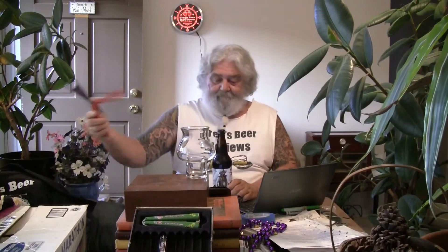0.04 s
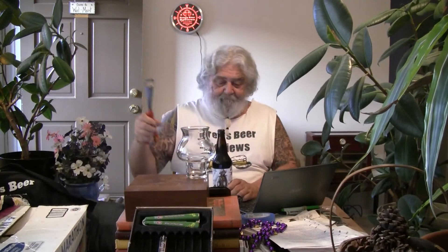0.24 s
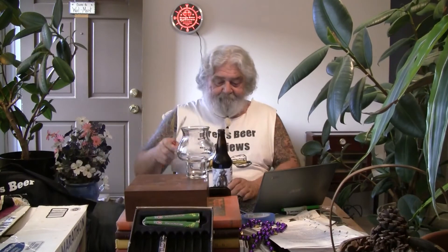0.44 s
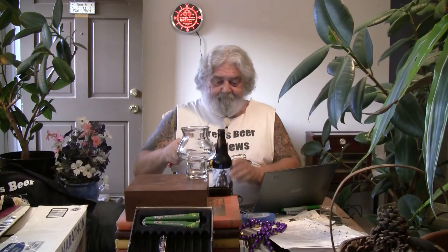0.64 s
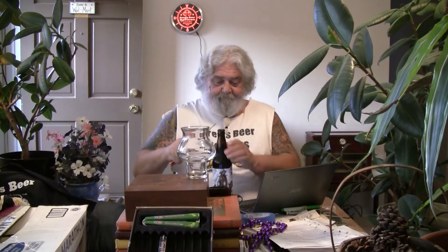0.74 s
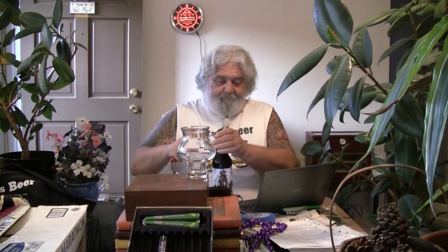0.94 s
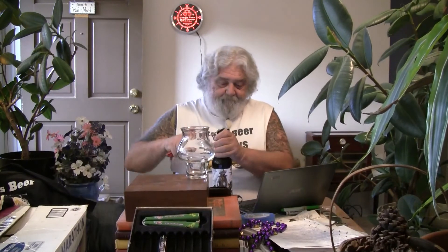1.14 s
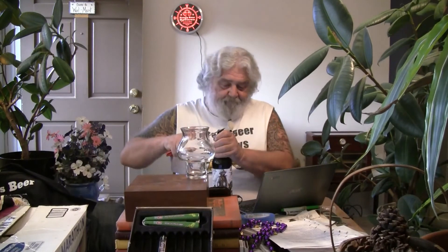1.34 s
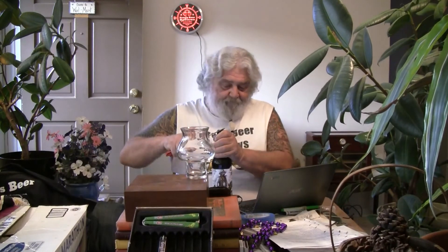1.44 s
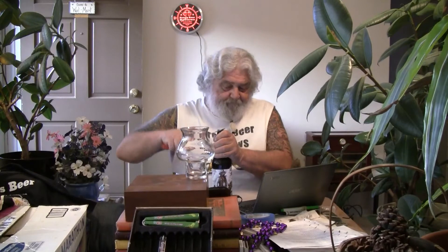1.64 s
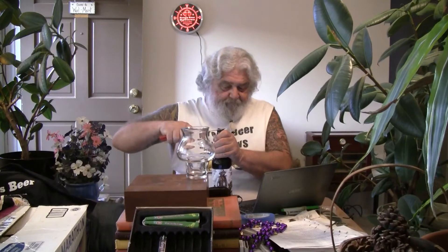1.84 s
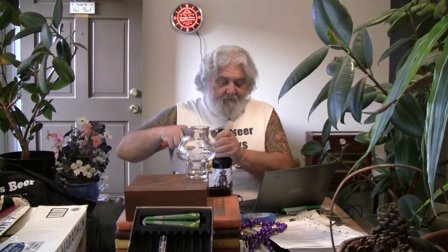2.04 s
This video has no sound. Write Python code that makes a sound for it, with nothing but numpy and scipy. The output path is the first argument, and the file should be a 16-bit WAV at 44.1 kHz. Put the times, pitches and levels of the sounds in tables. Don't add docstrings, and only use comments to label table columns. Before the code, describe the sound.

Opening a glass beer bottle: metal handles rattle, steel knocks the neck, gas spurts, cap ticks loose

```python
import sys
import numpy as np
from scipy import signal
from scipy.fft import rfft, irfft
from scipy.io import wavfile
from scipy.ndimage import uniform_filter1d

SR = 44100
rng = np.random.default_rng(int(sys.argv[2]) if len(sys.argv) > 2 else 0)


def int16_out(signal):
    q = np.round(np.clip(np.atleast_2d(signal).T, -1, 1) * 32767)
    wavfile.write(sys.argv[1], SR, q.astype(np.int16))


def how_loud(loudness_db):
    steps = np.asarray(loudness_db, float) / 20
    return 10 ** steps


N = 92610


def rms_one(x):
    return x / np.sqrt(np.mean(x ** 2) + 1e-20)


def at_hz(points, hz):
    points = np.array(points)
    return np.interp(np.log(hz), np.log(points[:, 0]), points[:, 1])


def colour(x, spectrum):
    size = x.shape[-1]
    hz = np.arange(size // 2 + 1) * SR / size + 1
    return irfft(rfft(x) * how_loud(at_hz(spectrum, hz)), size)


def pair(likeness, size):
    mid, side = rfft(rng.standard_normal((2, size)))
    hz = np.arange(len(mid)) * SR / size + 1
    alike = np.clip(at_hz(likeness, hz), -1, 1)
    sides = np.sqrt(1 + alike) * mid + np.sqrt(1 - alike) * side * [[1], [-1]]
    return irfft(sides, size) / np.sqrt(2)


def contacts(hits):
    t = np.arange(2000) / SR
    push = np.zeros((len(hits), N + 2000))
    for row, (start_s, db, rattle_s) in zip(push, hits):
        grit = np.prod(rng.standard_normal((2, 2000)), axis=0)
        burst = np.sign(grit) * abs(grit) ** .65 * np.exp(-t / max(rattle_s, 1e-4))
        burst = burst * (t < 2 * rattle_s) * np.minimum(t / 0.00061, 1)
        start = int(start_s * SR)
        row[start:start + 2000] = how_loud(db) * burst / np.sqrt(np.sum(burst ** 2) + 1e-12)
    return push[:, :N]


def strike(hits, modes, ring_share, spread_db, crack_db, crack_hz, crack=None, split=0, swell=0.17):
    luck = rng.standard_normal((len(hits), 3 * len(modes)))
    out, push = np.zeros(N), contacts(hits)
    levels = how_loud(np.array(hits)[:, 1])
    heads = np.array([row[int(hit[0] * SR):][:1400] for row, hit in zip(push, hits)])
    trios = [(hz * (1 + split * k), db - 5, t60) for hz, db, t60 in modes for k in (-1, .2, .9)]
    for (hz, db, t60), strengths in zip(trios, luck.T):
        w = 2 * np.pi * hz / SR
        reached = abs(heads @ np.exp(1j * w * np.arange(1400)))
        even = levels / np.maximum(reached, levels / 4)
        drive = (even * how_loud(db + spread_db * strengths)) @ push + 1e-18
        q = np.exp(-swell * w / 2)
        fed = signal.lfilter([(1 - q * q) / 2, 0, (q * q - 1) / 2], [1, -2 * q * np.cos(w), q * q], drive)
        r = how_loud(-60 / (t60 * ring_share * SR))
        out += signal.lfilter([0, np.sin(w)], [1, -2 * r * np.cos(w), r * r], fed)
    band = signal.butter(4, crack_hz, "band", fs=SR, output="sos")
    dry_crack = signal.sosfilt(band, push.sum(axis=0))
    if crack is not None:
        dry_crack = colour(dry_crack, crack)
    return out + how_loud(crack_db) * dry_crack


# start in seconds, level in dB, rattle in seconds.
HANDLE_CLACKS = [
    (.1205, -36.5, 0.0016),
    (.1245, -19, 0.0075),
    (.132, -19.5, 0.0066),
    (.140, -20.5, 0.0046),
    (.147, -27.5, 0.0039),
    (.1545, -15.5, 0.0049),
    (.159, -19.5, 0.0058),
    (.172, -25, 0.0036),
    (.180, -27, 0.0031),
    (.214, -34, 0.0037),
]
# frequency in Hz, level in dB, T60 in seconds.
HANDLE_MODES = [(2800, -12.5, 0.27), (3037, -11, 0.077), (4155, -7, 0.064), (4217, -0.5, .1),
                (4750, -11, 0.089), (6133, -15, 0.16), (8344, -11, 0.21), (8800, -0.5, 0.11),
                (9857, -12.5, 0.62), (11100, -14.5, 0.061), (10550, 0, 0.036), (11130, -20, 0.0511),
                (12800, -16, .05), (14100, -13.5, .08)]
# frequency in Hz, level in dB per Hz.
HANDLE_CRACK = [(400, -29), (750, -23.5), (2000, -23), (2750, -10), (4200, -9.5), (5500, -9.5), (10500, -6),
                (15800, -15.5)]


def handles_clack():
    return strike(HANDLE_CLACKS, HANDLE_MODES, ring_share=0.42, spread_db=1.0,
                  crack_db=34.5, crack_hz=[450, 15500], crack=HANDLE_CRACK, split=.011)


# start in seconds, level in dB, rattle in seconds.
JINGLE_HITS = [(.0002, -38.5, 0.016), (.039, -50, 0.0039), (.0515, -39, 0.0044), (.064, -43.5, .004),
               (.0705, -44.5, .006), (.090, -52.5, 0.0034), (.102, -54, 0.0091)]
# frequency in Hz, level in dB, T60 in seconds.
LOOSE_MODES = [(3630, -9, .03), (4040, -2, .03), (4720, 0.5, 0.018), (6200, -10, .1), (8350, -8, 0.051),
               (9500, -8, .04), (9860, -15.5, 0.042), (10750, -10, .04)]


def handles_jingle():
    return strike(JINGLE_HITS, LOOSE_MODES, ring_share=0.53, spread_db=3.5,
                  crack_db=23, crack_hz=[1500, 10500], split=0.017)


# start in seconds, level in dB, rattle in seconds.
LATCH_HITS = [
    (.3365, -45, 0.0074),
    (.3572, -31.5, .003),
    (.371, -44.5, .005),
    (.478, -62, 0.0024),
]
# frequency in Hz, level in dB, T60 in seconds.
PIVOT_MODES = [(2900, -2, .08), (2940, -4, 0.052), (3036, -10, 0.1), (3140, 1.5, 0.13), (4400, -32, 0.024),
               (8500, -16.5, 0.066), (9580, -8, 0.184), (10180, -18.5, 0.18), (12350, -24, 0.064)]


def pivot_latches():
    return strike(LATCH_HITS, PIVOT_MODES, ring_share=0.26, spread_db=4.0,
                  crack_db=17, crack_hz=[2400, 10000], split=0.0028)


# start in seconds, level in dB, rattle in seconds.
SQUEAK_HITS = [
    (.513, -60.5, .011),
]
# frequency in Hz, level in dB, T60 in seconds.
PIN_MODES = [(6400, 0, .04)]


def pin_squeaks():
    return strike(SQUEAK_HITS, PIN_MODES, ring_share=0.41, spread_db=-7.0, crack_db=-29, crack_hz=[2000, 9000])


# start in seconds, level in dB, rattle in seconds.
CLINK_HITS = [
    (.9685, -32.5, 0.00159),
    (.992, -48, .002),
]
# frequency in Hz, level in dB, T60 in seconds.
BLADE_MODES = [(1536, -25, .04), (2020, -16, 0.044), (3025, 0.5, .1), (3060, -15, 0.25), (3720, -12, 0.23),
               (4080, -14, 0.12), (5210, -12, 0.27), (5400, -16.5, 0.4), (6690, -13.5, .1), (7150, -17, .1),
               (7540, -15.5, .15), (8500, -18, .2), (9600, -20, 0.14), (10790, -27, .2)]


def blade_clinks():
    return strike(CLINK_HITS, BLADE_MODES, ring_share=0.72, spread_db=3.0,
                  crack_db=10, crack_hz=[1300, 9000], split=0.0047)


# start in seconds, level in dB, rattle in seconds.
BITE_HITS = [
    (1.0705, -29, .005),
    (1.099, -39.5, 0.0057),
]
# frequency in Hz, level in dB, T60 in seconds.
CRIMP_MODES = [(2284, -8, 0.093), (2456, -10, 0.14), (3155, 2.5, 0.092), (3490, -9.5, .2),
               (3811, -10.5, 0.074), (4150, -9, 0.17), (4450, -7.5, .15), (5370, -6.5, 0.17),
               (6770, -10, 0.11), (7740, -17.5, 0.13), (9000, -15, 0.11), (9900, -11, .15),
               (10700, -22, .12), (12500, -22, .08)]


def lip_bites():
    return strike(BITE_HITS, CRIMP_MODES, ring_share=0.32, spread_db=-0.5,
                  crack_db=-12, crack_hz=[1800, 11500], split=0.0089)


# start in seconds, level in dB, rattle in seconds.
SEAT_HITS = [
    (1.071, -33, 0.0016),
    (1.104, -58, .004),
    (1.1775, -40, 0.012),
    (1.221, -49.5, 0.0074),
]
# frequency in Hz, level in dB, T60 in seconds.
SHOULDER_MODES = [(776, -15, 0.027), (867, -2, 0.032), (978, 2.5, 0.041), (1320, -4.5, 0.0172)]


def shoulder_answers():
    return strike(SEAT_HITS, SHOULDER_MODES, ring_share=0.48, spread_db=5.0,
                  crack_db=0, crack_hz=[500, 1800], split=0.042, swell=.4)


# start in seconds, level in dB, rattle in seconds.
BUMP_HITS = [
    (1.079, -33, 0.0066),
    (1.098, -36.5, 0.0038),
    (1.1775, -46.5, 0.0022),
    (1.225, -44.5, 0.00814),
    (1.693, -38.5, 0.0061),
    (1.7075, -28.5, 0.011),
    (1.722, -38.5, 0.0048),
    (1.745, -44.5, 0.0053),
    (1.765, -43, 0.0055),
    (1.80, -45, 0.025),
]
# frequency in Hz, level in dB, T60 in seconds.
TABLE_MODES = [(135, -17, 0.033), (187, -14, .079), (281, -5.5, 0.069), (355.3, 1, 0.066), (482, -4.5, 0.1),
               (601, -5.5, 0.084), (832, -7.5, 0.026), (992, -2.5, 0.038), (1363, -9, 0.026),
               (1880, -11.5, 0.021)]


def table_bumps():
    return strike(BUMP_HITS, TABLE_MODES, ring_share=0.41, spread_db=3.5,
                  crack_db=10, crack_hz=[150, 1800], split=0.068, swell=1.0)


# start in seconds, level in dB, rattle in seconds.
THUD_HITS = [
    (.938, -38.5, 0.0062),
    (.953, -43.5, 0.015),
    (.975, -41, 0.016),
]
# frequency in Hz, level in dB, T60 in seconds.
BELLY_MODES = [(338, -4.5, .05), (438, 1.5, 0.062), (508, 2, .06), (666, -8, 0.045), (1421, -1.5, 0.036),
               (1920, -2.5, 0.024)]


def belly_thuds():
    return strike(THUD_HITS, BELLY_MODES, ring_share=0.66, spread_db=4.0,
                  crack_db=1, crack_hz=[300, 4000], split=0.039, swell=1.0)


# frequency in Hz, level in dB per Hz.
GAS_SPECTRUM = [(530, -14), (900, -14.5), (1700, -15), (2090, -15), (4090, -8), (6230, -9), (6770, -6.5),
                (11500, -0.5), (15900, -7.5)]


def gas():
    start_s, rise_s, hold_s, t60_s, level_db = 1.661, 0.016, 0.014, 0.057, -25.5
    t = np.arange(N) / SR - start_s
    fall = how_loud(-60 * np.clip(t - rise_s - hold_s, 0, 1) / t60_s)
    shape = np.clip(t / rise_s, 0, 1) * fall
    spit = how_loud(0.78 * rms_one(uniform_filter1d(rng.standard_normal(N), size=60)))
    jet = rms_one(spit * colour(rng.standard_normal(N), GAS_SPECTRUM))
    return how_loud(level_db) * shape * jet


# start in seconds, level in dB, rattle in seconds.
KNOCK_HITS = [
    (.9365, -22, 0.0016),
    (1.0745, -62, 0.0026),
]
# frequency in Hz, level in dB, T60 in seconds.
RIM_MODES = [(1500, -37, 0.015), (4070, -21, 0.049), (6850, -14.5, 0.067), (9200, -31, 0.018),
             (11950, -21, 0.03)]
# frequency in Hz, level in dB, T60 in seconds.
BOTTLE_MODES = [(386.2, -14.5, 0.32), (452, -5.5, 0.07), (484, -11.5, 0.073), (585, -10, 0.066),
                (1035.3, 0, 0.21)]


def neck_knocks():
    rim = strike(KNOCK_HITS, RIM_MODES, ring_share=1.0, spread_db=2.0,
                 crack_db=8.0, crack_hz=[1300, 11000], split=0.046)
    body = strike(KNOCK_HITS, BOTTLE_MODES, ring_share=0.92, spread_db=6.0,
                  crack_db=-20, crack_hz=[300, 1500], swell=0.071)
    return rim, body


# start in seconds, level in dB, rattle in seconds.
POP_HITS = [
    (1.7105, -31.5, .006),
]
# frequency in Hz, level in dB, T60 in seconds.
HEADSPACE_MODES = [(136.4, -9, 0.033), (228, -5, 0.032), (403, -4, 0.056)]


def neck_pops():
    return strike(POP_HITS, HEADSPACE_MODES, ring_share=0.61, spread_db=-2.0,
                  crack_db=1, crack_hz=[150, 900], swell=0.71)


# start in seconds, level in dB, rattle in seconds.
DROP_HITS = [
    (1.9035, -41.5, 0.0045),
    (2.0625, -45.5, 0.0027),
]
# frequency in Hz, level in dB, T60 in seconds.
NECK_MODES = [(484, 4.5, 0.082), (722, -2, 0.071), (1290, 2, 0.016), (1677, -0.5, 0.038),
              (1970, -2.5, 0.0094)]


def cap_drops():
    return strike(DROP_HITS, NECK_MODES, ring_share=0.66, spread_db=-0.5,
                  crack_db=12, crack_hz=[300, 2500], split=0.014, swell=0.33)


# start in seconds, level in dB, rattle in seconds.
TICK_HITS = [
    (1.9045, -56.5, 0.0016),
    (1.9085, -46, 0.00046),
    (1.937, -68, 0.0026),
    (2.003, -64, 0.003),
    (2.024, -63, 0.018),
    (2.0635, -63, .002),
    (2.0675, -62.5, 0.0034),
]
# frequency in Hz, level in dB, T60 in seconds.
CAP_MODES = [(3870, 9, 0.022), (6500, 7.5, 0.017), (7600, 1, .02), (9500, 4.5, 0.021), (9600, -6, 0.011),
             (11200, -0.5, .04), (13700, -15, .02)]


def cap_ticks():
    return strike(TICK_HITS, CAP_MODES, ring_share=0.4, spread_db=-3.0,
                  crack_db=-5, crack_hz=[2500, 14000], split=0.028, swell=0.13)


# frequency in Hz, left-right likeness from -1 to 1.
ECHO_LIKENESS = [(100, 1), (500, 0.86), (1500, 1), (4000, 0.81), (8000, 0.42), (14000, -0.66)]
# frequency in Hz, T60 in seconds.
ECHO_T60 = [(100, 0.54), (400, 0.28), (1000, 0.31), (3000, 0.26), (4500, 0.28), (9000, 0.25), (15000, 0.24)]


def room(x):
    level_db, gap_s = 2.5, 0.002
    size = SR // 2
    t, noise, echo = np.arange(size) / SR, pair(ECHO_LIKENESS, size), 0
    edges = 40 * 2 ** np.arange(0, 9.01, .5)
    for low, high in zip(edges, edges[1:]):
        band = signal.sosfilt(signal.butter(2, [low, high], "band", fs=SR, output="sos"), noise)
        echo = echo + band * how_loud(-60 * t / at_hz(ECHO_T60, np.sqrt(low * high)))
    power = np.mean(abs(rfft(echo)) ** 2, axis=0)
    even = np.sqrt(uniform_filter1d(power, size=800) / uniform_filter1d(power, size=40))
    echo = irfft(rfft(echo) * even, size)
    echo = echo * np.clip(t / gap_s, 0, 1) ** 2 * (t < .33)
    echo = how_loud(level_db) * echo / np.sqrt(np.sum(echo ** 2) / 2)
    return signal.fftconvolve(x[None], echo, axes=1)[:, :N]


# frequency in Hz, level in dB per Hz.
AIR_SPECTRUM = [(25, -28.5), (95, -17.5), (114, -14), (175, -9.5), (267, -4), (1000, -12), (4000, -31.5),
                (13500, -42.5)]
# frequency in Hz, left-right likeness from -1 to 1.
AIR_COHERENCE = [(60, 0.34), (120, 0.43), (240, -0.3), (950, -0.49), (3770, 0.32), (15000, -0.43)]
# frequency in Hz, rms level in dB.
HUM_TONES = [(120.5, -66), (241, -65)]


def air():
    level_db, top_hz = -49.5, 14000
    t = np.arange(N) / SR
    waver = how_loud(1.0 * rms_one(uniform_filter1d(rng.standard_normal(N), size=4000)))
    hum = sum(np.sqrt(2) * how_loud(db) * np.sin(2 * np.pi * hz * t) for hz, db in HUM_TONES)
    noise = rms_one(colour(pair(AIR_COHERENCE, N), AIR_SPECTRUM))
    noise = signal.sosfilt(signal.cheby2(12, 50, top_hz, fs=SR, output="sos"), noise)
    return how_loud(level_db) * noise + waver * hum


def ports(near):
    turn_hz, width_hz = 13800, 19000
    r, c = np.exp(-np.pi * width_hz / SR), np.cos(2 * np.pi * turn_hz / SR)
    near[1] = signal.lfilter([r * r, -2 * r * c, 1], [1, -2 * r * c, r * r], near[1])
    near[0, 2:] = near[0, :-2].copy()
    return near


def scene():
    opener = handles_clack() + handles_jingle() + pivot_latches() + pin_squeaks()
    bottle = (blade_clinks() + lip_bites() + shoulder_answers() + table_bumps()
              + belly_thuds() + gas())
    rim, body = neck_knocks()
    bottle = bottle + rim
    cap = body + neck_pops() + cap_drops() + cap_ticks()
    near = ports(opener * how_loud([[-.7], [.7]]) + (bottle + cap) * how_loud([[-.6], [.6]]))
    echoes = room(opener + how_loud(-2.0) * bottle + how_loud(-4.5) * cap)
    heard = how_loud(-1.5) * (near + echoes)
    bass_cut = signal.butter(4, 115, "high", fs=SR, output="sos")
    return signal.sosfilt(bass_cut, heard) + air()


def band_limit(x):
    return signal.sosfilt(signal.butter(12, 16100, fs=SR, output="sos"), x)


def record(dry):
    balance_db, cutoff_hz = 0.97, 16050
    balanced = dry * how_loud([[-balance_db / 2], [balance_db / 2]])
    mix = signal.sosfilt(signal.cheby2(12, 60, cutoff_hz, fs=SR, output="sos"), balanced)
    return band_limit(mix)


dry = scene()
out = record(dry)
int16_out(out)
```